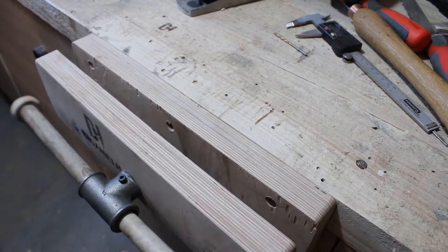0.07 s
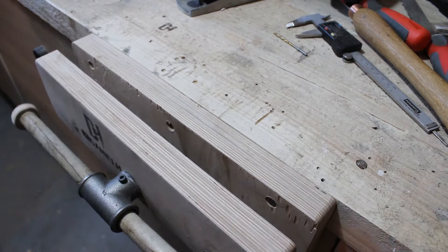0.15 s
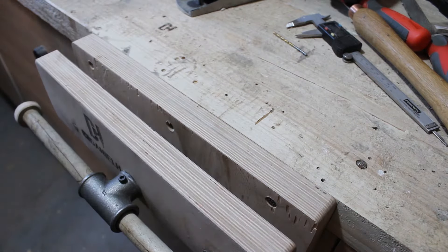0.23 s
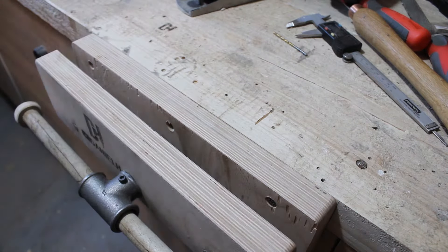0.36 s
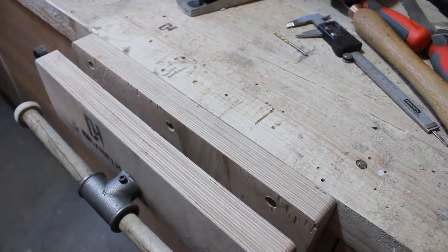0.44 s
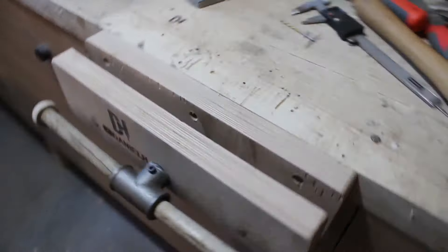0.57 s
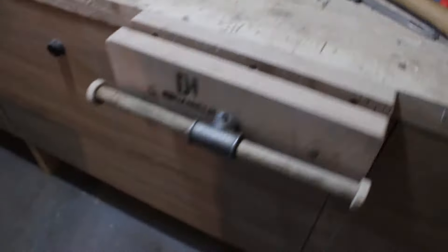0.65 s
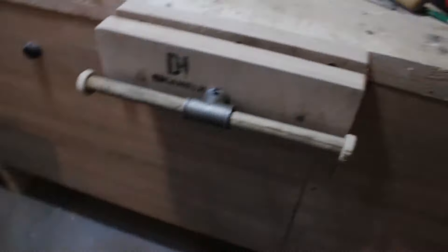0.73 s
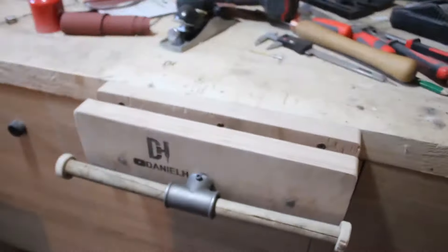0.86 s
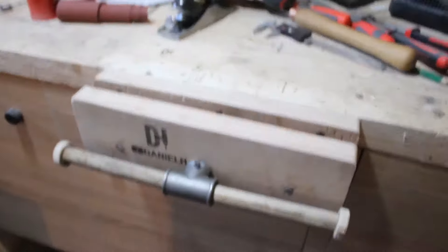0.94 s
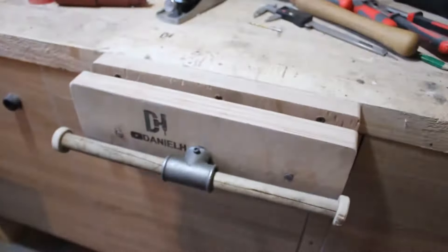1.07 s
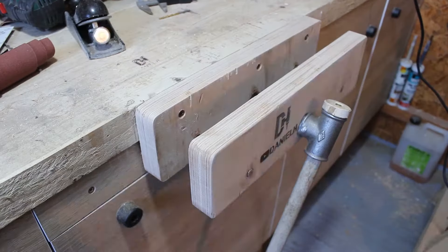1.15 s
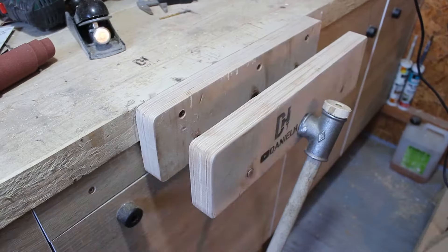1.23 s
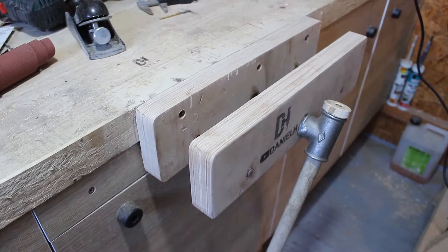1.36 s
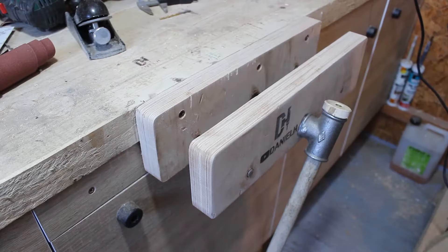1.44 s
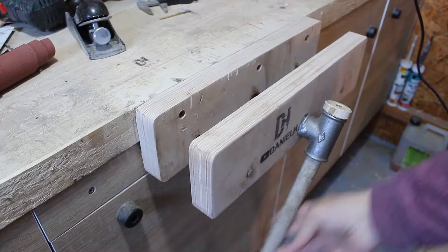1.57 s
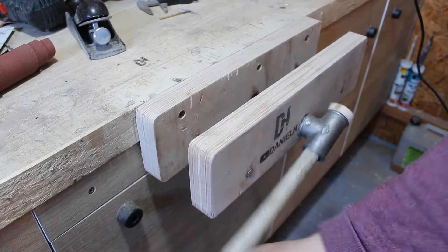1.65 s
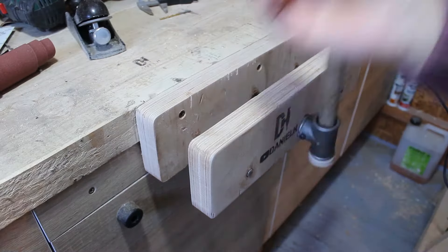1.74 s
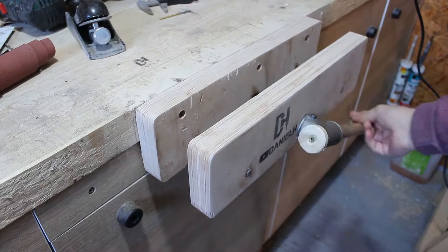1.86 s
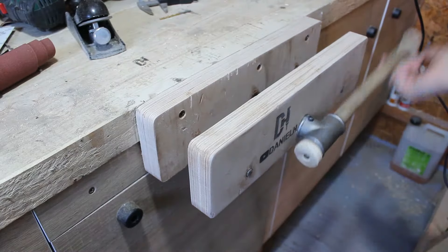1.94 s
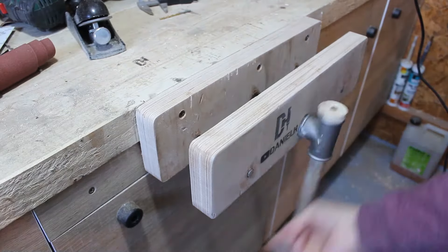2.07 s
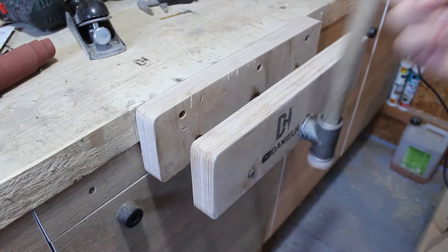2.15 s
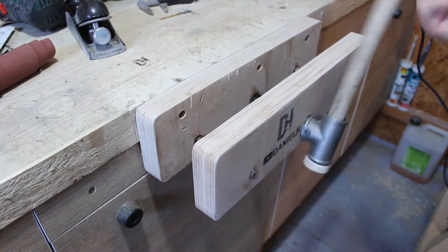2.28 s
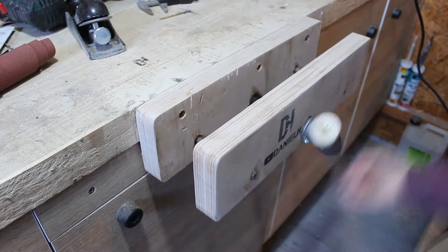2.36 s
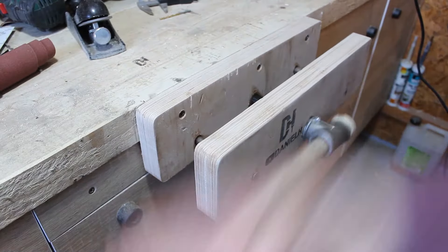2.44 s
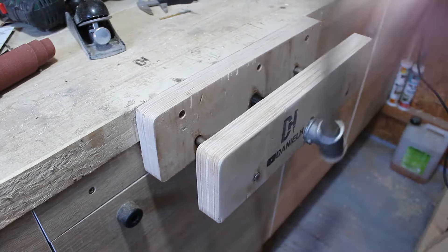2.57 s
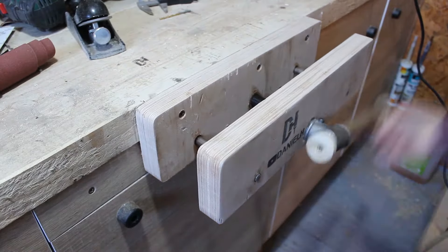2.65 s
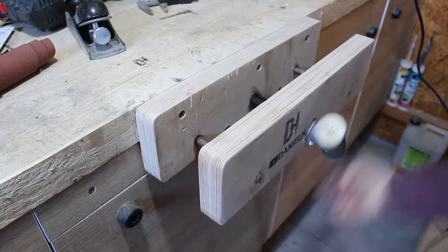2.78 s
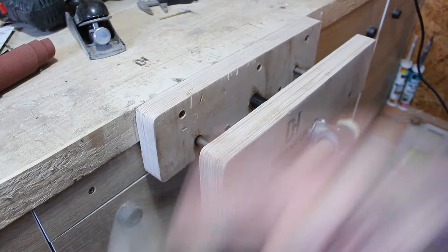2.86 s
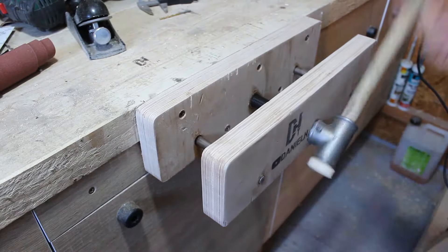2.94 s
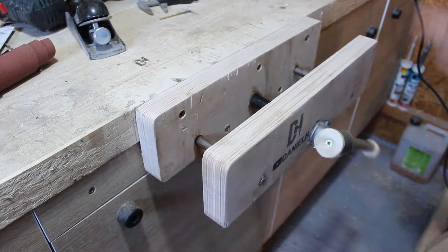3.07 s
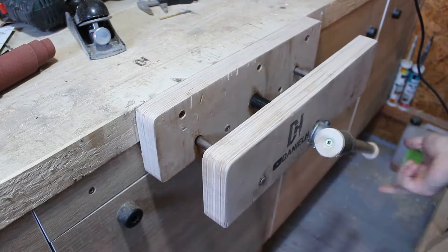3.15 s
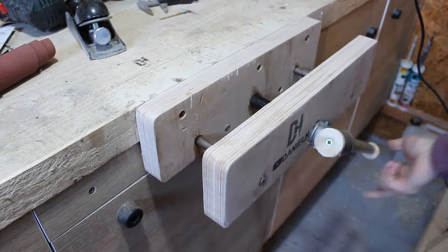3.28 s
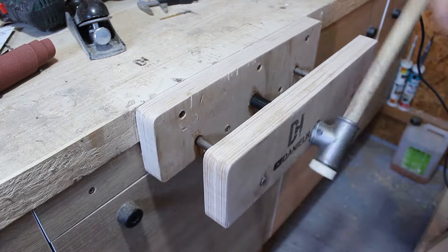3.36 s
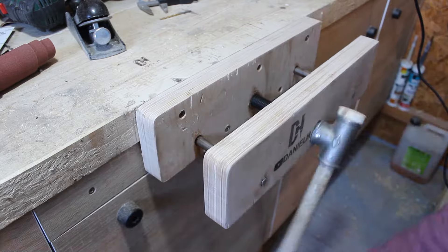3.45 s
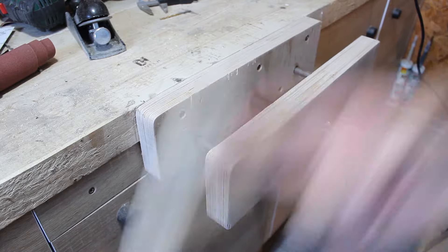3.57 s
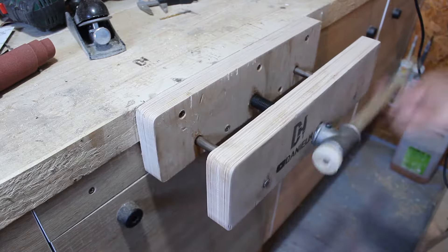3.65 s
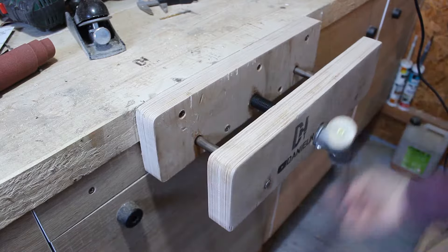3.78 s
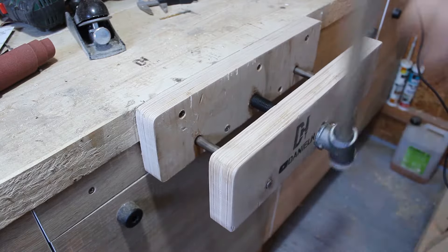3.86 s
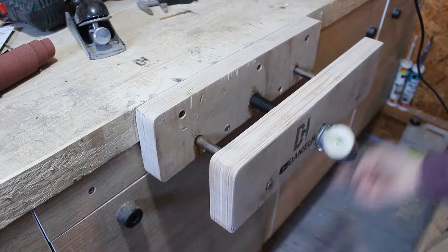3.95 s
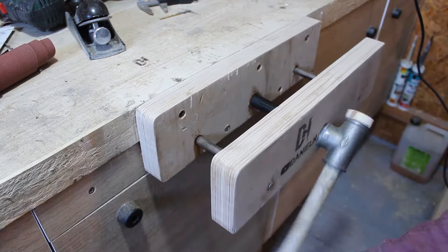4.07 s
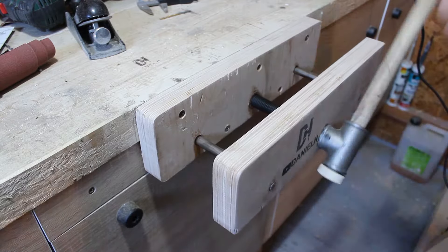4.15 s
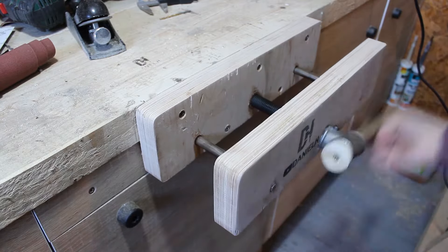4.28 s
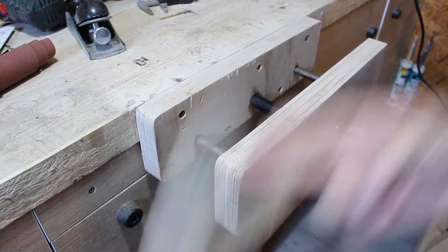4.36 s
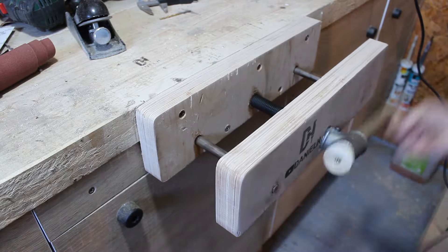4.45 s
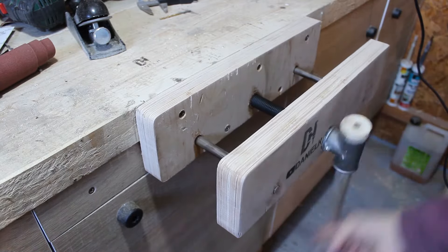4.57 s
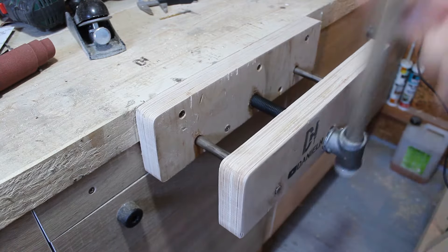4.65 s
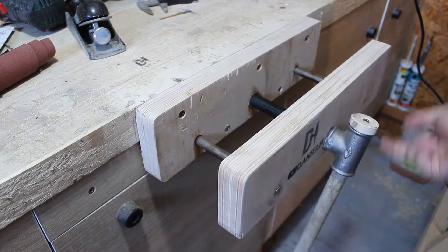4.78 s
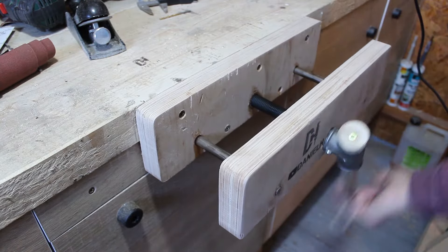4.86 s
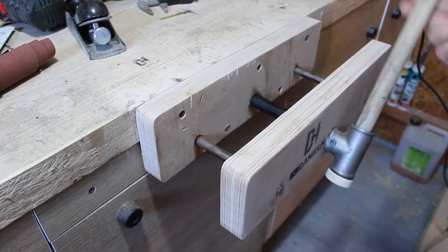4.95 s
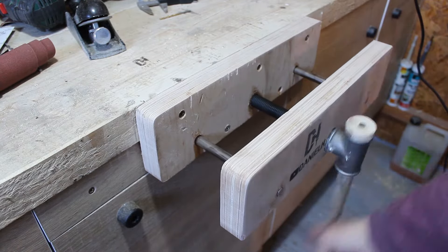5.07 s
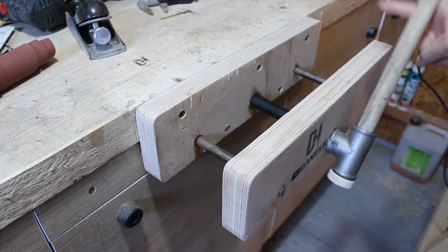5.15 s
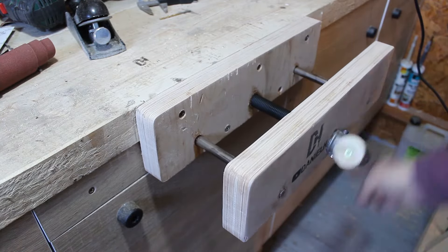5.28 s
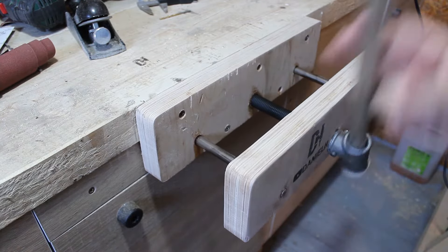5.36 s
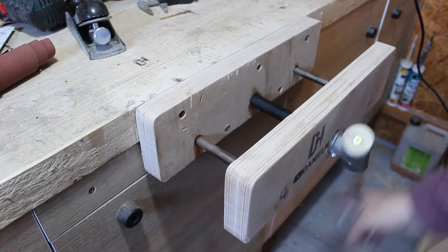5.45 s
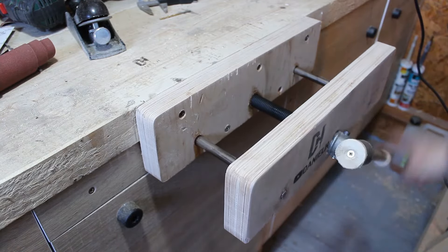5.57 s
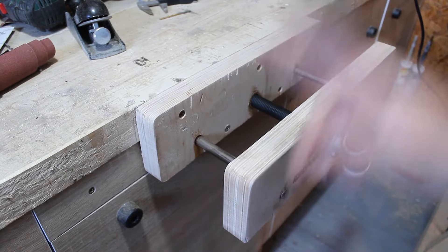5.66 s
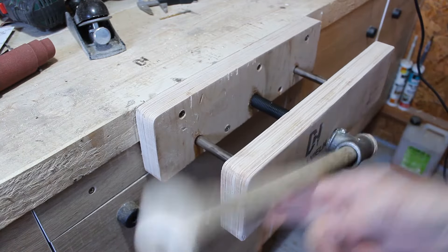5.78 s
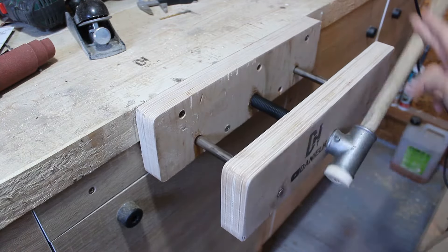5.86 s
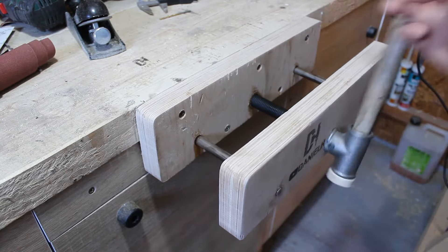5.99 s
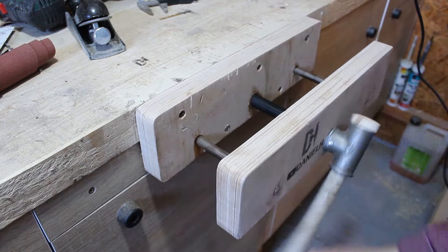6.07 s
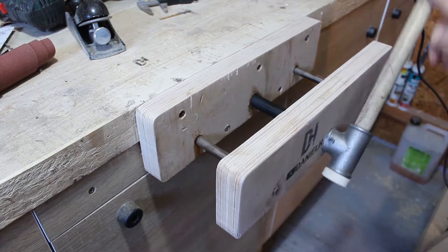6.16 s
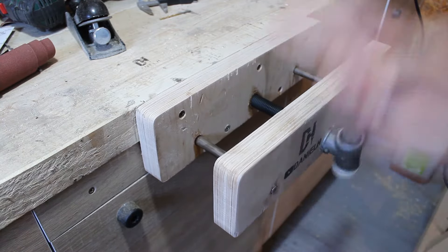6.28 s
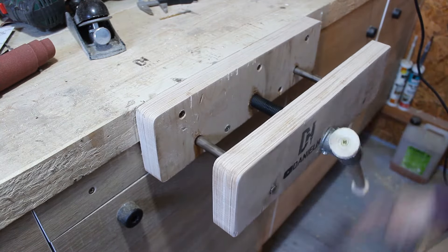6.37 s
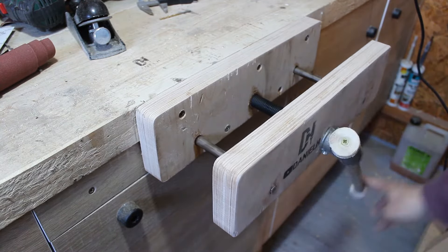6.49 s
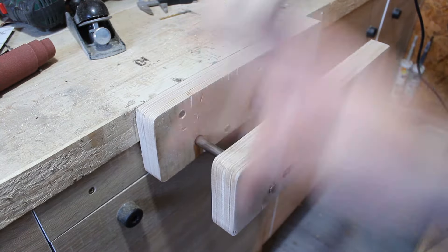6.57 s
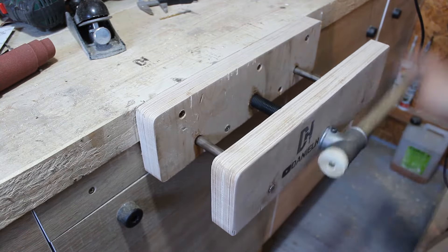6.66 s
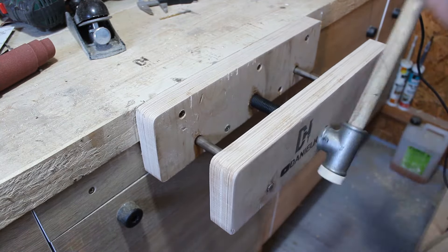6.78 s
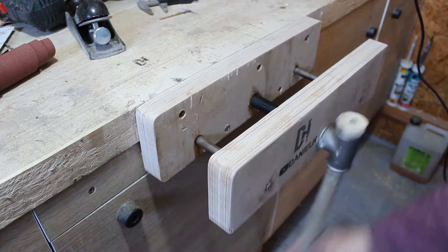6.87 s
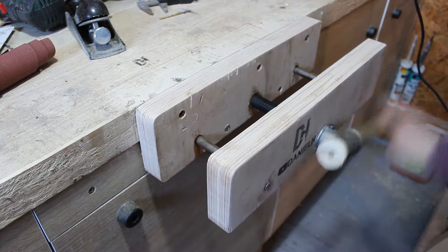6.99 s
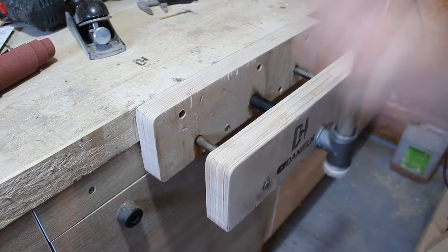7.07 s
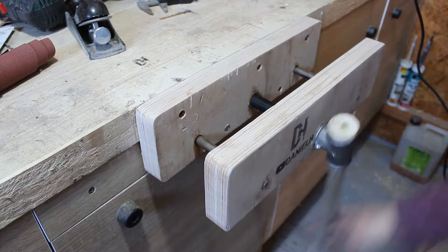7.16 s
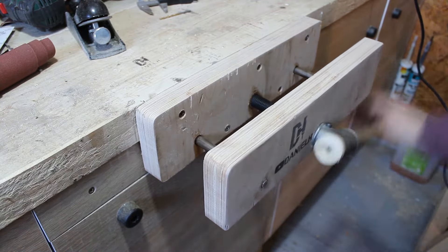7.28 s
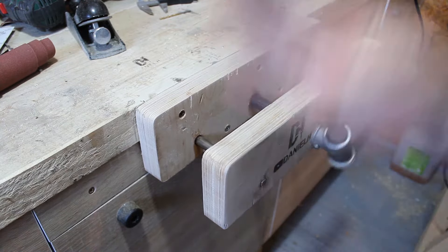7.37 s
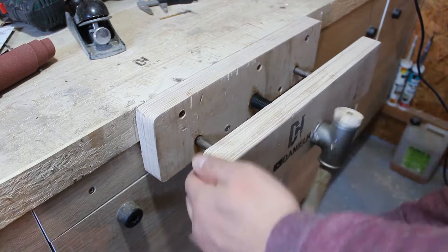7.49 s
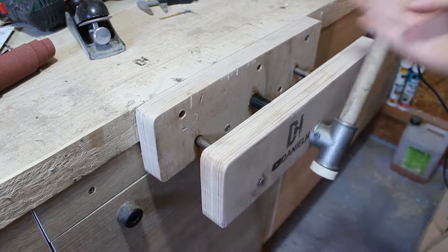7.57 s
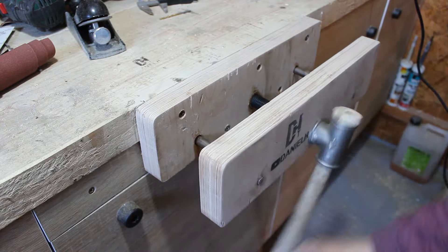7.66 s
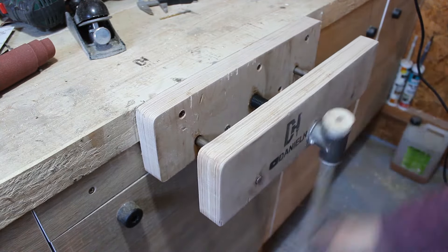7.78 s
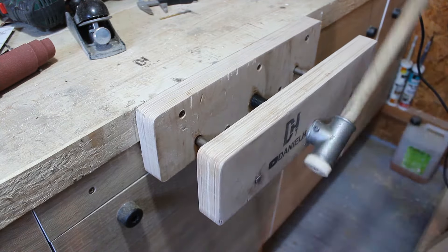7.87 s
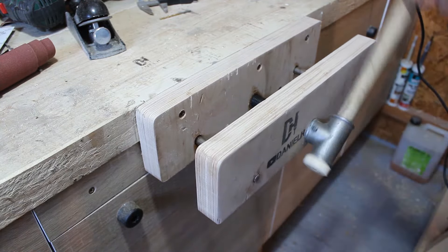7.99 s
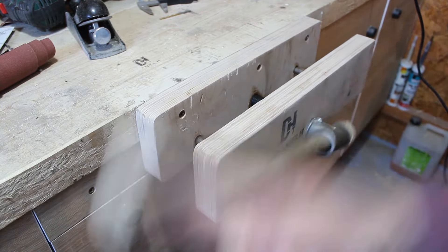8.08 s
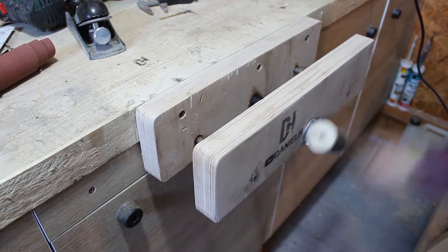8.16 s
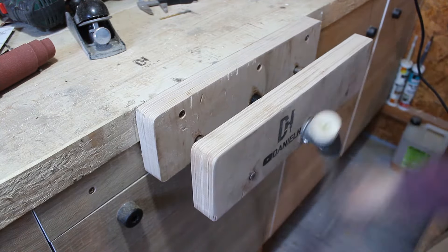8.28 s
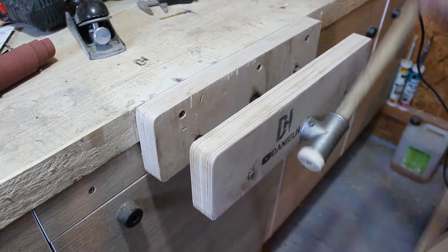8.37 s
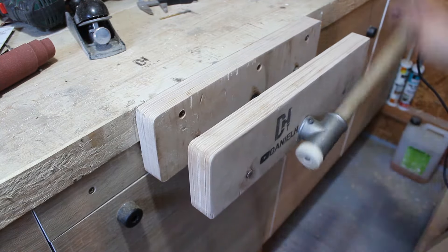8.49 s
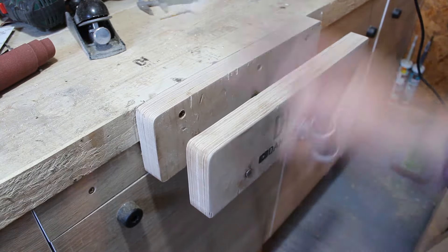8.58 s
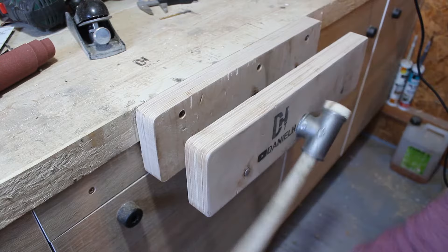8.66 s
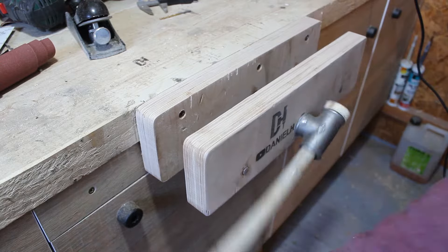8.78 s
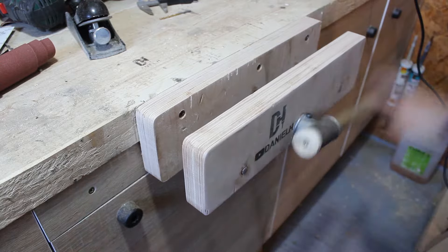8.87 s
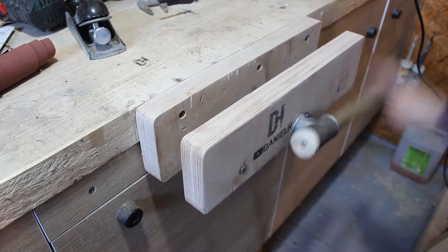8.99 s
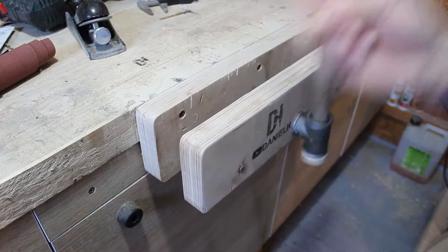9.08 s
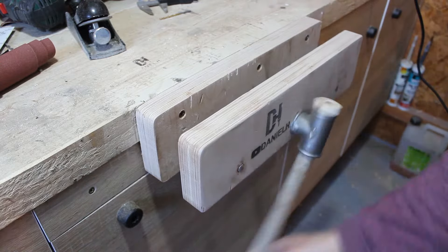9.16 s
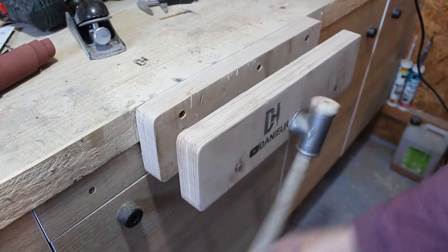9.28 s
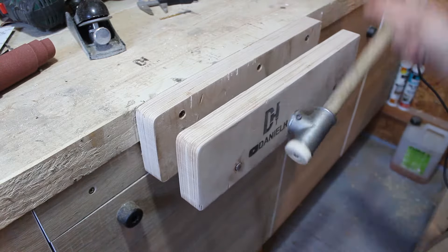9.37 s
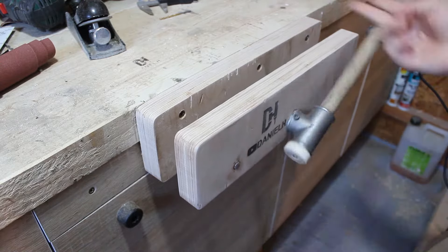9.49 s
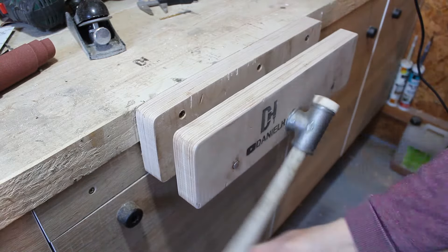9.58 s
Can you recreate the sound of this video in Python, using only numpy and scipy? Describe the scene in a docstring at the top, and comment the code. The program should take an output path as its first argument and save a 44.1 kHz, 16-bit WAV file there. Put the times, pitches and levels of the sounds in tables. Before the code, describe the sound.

A quick wood-on-metal rattle fades into small handling noises on the microphone housing. After a soft start, a dry steel thread grinds in rhythmic rasps as a wooden bench vise is wound out, with short gaps between strokes, hollow knocks from its sliding handle and soft creaks. Winding back, it gives a run of firm clicks, then keeps rasping. Close, dry sound with little room echo over faint still air.

```python
"""The steel screw of a wooden bench vise is wound in strokes: rough friction rubs it in its nut, rings the
plywood jaw and rasps about seven times a second as the screw wobbles. The loose wooden handle slides and
knocks in its pipe tee and the thread clicks: short rough blows that ring resonances, bench and room.
Around them lie jaw bumps, creaks, a squeak, a dowel rattle, a faint ring of the screw, fingers and a
lens whine on a hand-held camera close by, and the still air of a small workshop."""
import sys
import numpy as np
from scipy import signal
from scipy.fft import rfft, irfft, next_fast_len
from scipy.io import wavfile
from scipy.ndimage import uniform_filter1d, map_coordinates

SR = 44100
rng = np.random.default_rng(int(sys.argv[2]) if len(sys.argv) > 2 else 0)


def persist_wave(psi):
    """Save psi, clipped to +-1, as 16-bit WAV."""
    counts = np.round(np.clip(psi, -1, 1) * 32767).astype(np.int16)
    wavfile.write(sys.argv[1], SR, np.atleast_2d(counts).T)


N = 424683
TIME = np.arange(N) / SR
LEAD_S = 0.012  # slide heard ahead of each blow

# resonances of jaw, screw and bench: (frequency [Hz], width [Hz], lift [dB])
VISE_MODES = [(211.4, 24, 18), (280.5, 59, 17.5), (370.5, 8.7, 18.5), (535.5, 39.5, 18.5),
              (586.6, 17.5, 11.5), (655.5, 25.3, 18.5), (854, 17, 6.5), (980, 16, 9), (1304.5, 25.4, 11),
              (1418, 11, 10.5), (1580, 40, 8), (1952, 36, 7), (2145, 51, 11), (2300, 79, 2.5),
              (3157, 85, 6), (3320, 190, 2.5), (3720, 570, 3.5), (4900, 150, 1.5), (5940, 200, 6),
              (6260, 215, 4), (7880, 110, 7)]


def undb(db):
    """Decibels to gain."""
    return 10 ** (np.asarray(db) / 20)


def unit(x):
    """Scale to rms 1."""
    return x / np.sqrt(np.mean(x ** 2))


def curve(rows, axis=1):
    """One column of a table, joined by straight lines in time."""
    rows = np.array(rows)
    return np.interp(TIME, rows[:, 0], rows[:, axis])


def walk(rate_hz):
    """Smooth random wandering with spread 1."""
    steps = max(int(SR / rate_hz), 1)
    held = np.repeat(rng.standard_normal(N // steps + 1), steps)[:N]
    return unit(uniform_filter1d(held, steps))


def add(track, start_s, sound):
    """Mix a sound into the track."""
    i = max(int(start_s * SR), 0)
    track[i:i + len(sound)] += sound[:N - i]


def band(x, lo_hz, hi_hz, order=4):
    """Causal band-pass."""
    edges_hz = [lo_hz, min(hi_hz, SR / 2 - 1)]
    return signal.sosfilt(signal.butter(order, edges_hz, "band", fs=SR, output="sos"), x)


def through(x, impulse):
    """Pass a sound through an impulse response."""
    return signal.fftconvolve(x, impulse)[:len(x)]


def causal(log_gain, order):
    """Frequency response of a causal filter with this log gain, its cepstrum cut at `order` samples."""
    cepstrum = irfft(log_gain)
    cepstrum[1:order] *= 2
    cepstrum[order:] = 0
    return np.exp(rfft(cepstrum))


def response(colour, modes=(), size=8192):
    """Impulse response of a body: a smooth causal colour, lifted at each resonance."""
    f = np.maximum(np.arange(size // 2 + 1) * SR / size, 1)
    hz, db = np.transpose(colour)
    colour_db = np.interp(np.log(f), np.log(hz), db)
    gain = causal(np.log(undb(colour_db)), order=size // 2)
    for centre, width, lift in modes:
        resonance = 1 / (1 + 1j * (f ** 2 - centre ** 2) / (f * width))
        gain = gain * (1 + (undb(lift) - 1) * resonance)
    return irfft(gain)


def echoes(t60_s, level_db, size=16384):
    """Dense reflections that build up in a few milliseconds and die away."""
    t = np.arange(size) / SR
    decay = np.exp(-np.log(1000) * t / t60_s)
    tail = rng.standard_normal(size) * decay * (1 - np.exp(-t / 0.0046))
    return undb(level_db) * tail / np.linalg.norm(tail)


def grit(size, spread_db):
    """Contact force of a rough surface: countless tiny slips of unequal strength."""
    return unit(rng.standard_normal(size) * undb(spread_db * rng.standard_normal(size)))


def even(force, order=260):
    """Soften chance peaks and holes in the spectrum of a force, so that mainly the body colours it."""
    even_share = 0.55  # share of the unevenness in log gain that is undone
    spectrum = rfft(force)
    return irfft(spectrum * causal(-even_share * np.log(np.abs(spectrum) + 1e-9), order))


def registers(level_db, pitch_hz, fall_db):
    """Level of each register of a blow: loudest at its pitch, weaker with every octave away from it."""
    # centres of the five registers: (frequency [Hz])
    centres_hz = np.array((220, 600, 1200, 2850, 8600))
    octaves = np.log2(centres_hz / min(pitch_hz, centres_hz[-1]))
    return level_db - fall_db * np.abs(octaves)


def spot(pitch_hz, lift_db):
    """The broad resonance of the place where a blow lands, its width a share of its pitch."""
    return [(pitch_hz, 0.42 * pitch_hz, lift_db)]


def struck(modes):
    """The loose dowel is held a little differently at every blow, so its resonances shift."""
    # spread from blow to blow: (shift as a share of the pitch, change of lift [dB])
    spread = (0.0087, 1.7)
    chance = rng.standard_normal((len(modes), 2)) * spread
    return [(hz * (1 + shift), width, max(lift + db, 0))
            for (hz, width, lift), (shift, db) in zip(modes, chance)]


def blow(body, contact_s, bands_db, spread_db, slide_db, bench_s, bench_db, room_s, room_db, size=12000):
    """A slide ends in a short rough contact that rings body, bench and room, set by five registers."""
    # borders of the five registers: (frequency [Hz])
    edges_hz = (50, 450, 800, 1800, 4500, 16500)
    t = np.arange(size) / SR - LEAD_S
    age = np.maximum(t, 0) / max(contact_s / 2, 1 / SR)  # the push peaks at half the contact time
    slide = (t < 0) * undb(slide_db) * np.exp(-np.abs(t) / 0.0024)
    push = age * np.exp(1 - age) + slide
    force = even(grit(size, spread_db) * push, order=80)
    reflections = echoes(bench_s, bench_db) + echoes(room_s, room_db)
    sound = through(even(force + through(force, reflections)), body)
    attack = int(0.03 * SR)  # each register is levelled over the first 30 ms of the blow
    parts = [band(sound, lo, hi) for lo, hi in zip(edges_hz, edges_hz[1:])]
    return sum(undb(db) * part / np.std(part[t >= 0][:attack]) for part, db in zip(parts, bands_db))


def air():
    """Quiet room tone: coloured noise whose level drifts slowly."""
    # still air of the workshop: (frequency [Hz], level [dB])
    air_colour = [(25, -7), (80, -1), (150, 4.5), (280, 6.5), (500, 2), (1500, 3), (3000, 0.5),
                  (7000, -3.5), (15500, -5)]
    tone = unit(through(rng.standard_normal(N), response(air_colour)))
    return undb(-54.5 + 0.86 * walk(0.57)) * tone


def camera():
    """Fingers tick, thump and brush on the housing while a faint whine sounds, as of the lens focusing."""
    # finger taps: (time [s], contact [s], level [dB], pitch [Hz], fall-off [dB per octave])
    taps = [(.376, 0.0022, -52.5, 10000, 15), (0.469, 0.0037, -52.5, 2400, 11),
            (.533, 0.0066, -47, 14000, 4), (0.592, 0.00087, -43.5, 13500, 2.5),
            (0.595, 0.0019, -30.5, 14200, 11), (0.732, 0.0027, -47.5, 222, 5), (0.754, 0.0055, -51, 220, 3),
            (0.811, 0.0027, -42.5, 900, 0.5), (0.8768, 0.0011, -41.5, 1150, 4), (0.882, .001, -50, 1130, 1),
            (0.898, 0.0089, -46.5, 600, 0.5), (0.913, 0.011, -48, 600, 4), (.993, 0.0022, -51, 8600, 8),
            (1.017, 0.0088, -44, 8600, 7), (1.048, .0007, -55, 7000, 3), (1.063, 0.004, -49.5, 8800, 6),
            (1.179, 0.0014, -39.5, 12500, 17), (1.446, .0048, -49.5, 2600, 14),
            (1.519, 0.0021, -52, 8660, 12), (1.597, 0.0064, -43, 8830, 4.5)]
    # force spectrum of a finger: (frequency [Hz], level [dB])
    tap_colour = [(40, -11), (110, 11), (300, 8), (850, 0.5), (2500, -11.5), (6500, -8), (10000, -5),
                  (13500, -7.5), (16000, -15)]
    # resonances of the housing: (frequency [Hz], width [Hz], lift [dB])
    housing = [(4320, 110, 6), (6400, 400, 13.5), (8100, 180, 6), (13500, 830, 9), (15100, 500, 10)]
    # fingers brush the housing: (time [s], level [dB])
    brush_levels = [(.52, -76), (.57, -48.5), (.66, -51), (.73, -69), (.84, -40), (1.08, -64), (1.2, -94)]
    # swells of the whine: (time [s], level [dB])
    lens_levels = [(.95, -90), (.98, -46), (1.09, -67), (1.125, -48), (1.18, -43), (1.195, -90)]
    # resonances of the whine: (frequency [Hz], width [Hz], lift [dB])
    lens_modes = [(3980, 27, 32), (4830, 90, 22), (5830, 32, 32), (6600, 250, 5), (7900, 180, 6),
                  (9600, 50, 19)]
    out = np.zeros(N)
    for s, contact_s, level_db, pitch_hz, fall_db in taps:
        tapped = response(tap_colour, housing + spot(pitch_hz, lift_db=12.0))
        bands_db = registers(level_db, pitch_hz, fall_db)
        add(out, s - LEAD_S, blow(tapped, contact_s, bands_db, spread_db=8.0, slide_db=-19,
                                  bench_s=0.022, bench_db=-4.0, room_s=0.8, room_db=-28))
    lens = response([(500, -18.5), (3000, -7), (15000, 8)], lens_modes)
    whine = unit(through(grit(N, spread_db=10.5), lens))
    skin = grit(N, spread_db=7.5)
    brush = unit(band(through(skin, response(tap_colour, housing)), 780, 17400))
    return out + whine * undb(curve(lens_levels)) + brush * undb(curve(brush_levels))


def rattle():
    """The level dowel is jogged and bounces from side to side in its tee, each blow at its own pitch."""
    # blows, before the layer gain: (time [s], contact [s], level [dB], pitch [Hz], fall-off [dB per octave])
    # a glancing blow falls off steeply either side of its pitch, a square one hardly at all
    bounces = [(0.042, 0.0036, -23, 1260, 14.5), (0.063, 0.0059, -52.5, 1500, -3.5),
               (.11, 0.0041, -34.5, 800, 1), (0.1176, 0.0016, -25, 910, 3), (0.155, 0.0021, -28, 3200, 3),
               (0.181, 0.0014, -32.5, 930, 5), (0.201, 0.0025, -36, 2730, 1),
               (0.239, 0.0046, -42.5, 3180, 0), (0.262, 0.004, -39.5, 3150, 1.5),
               (.304, 0.0072, -46.5, 2400, 4.5)]
    # force spectrum of a bounce: (frequency [Hz], level [dB])
    rattle_colour = [(130, -35), (210, 3), (1100, 12), (2200, -3), (4200, -7), (10000, -23)]
    # resonances of the dowel lying level: (frequency [Hz], width [Hz], lift [dB])
    dowel = [(426, 32, 4), (630, 27, 11), (871, 25, 11.5), (1462, 62, 13), (1723, 50, 6), (2800, 86, 7),
             (3250, 200, 13), (4100, 280, 5.5), (6000, 170, 6.5)]
    out = np.zeros(N)
    for s, contact_s, level_db, pitch_hz, fall_db in bounces:
        body = response(rattle_colour, struck(dowel) + spot(pitch_hz, lift_db=3.5))
        bands_db = registers(level_db, pitch_hz, fall_db)
        bands_db[0] += -2.5  # the light dowel barely shakes the bench
        add(out, s - LEAD_S, blow(body, contact_s, bands_db, spread_db=4, slide_db=-6.5,
                                  bench_s=0.049, bench_db=-4.5, room_s=0.28, room_db=-13.5))
    return undb(-1.1) * out


def creak():
    """Dry spots sing and groan softly as they start to slip: wavering stick-slip tones."""
    # one curve for each creak: (time [s], pitch [Hz], level [dB])
    creaks = [
        [(.55, 259, -58), (.61, 292, -52), (.67, 326, -59), (.70, 320, -72)],
        [(1.21, 582, -75), (1.24, 576, -54.5), (1.6, 580, -63), (1.95, 580, -62), (2.0, 580, -69)],
        [(1.22, 250, -79), (1.28, 255, -56), (1.37, 243, -54), (1.42, 240, -78)],
        [(1.23, 850, -90), (1.26, 917, -58), (1.30, 1154, -55), (1.34, 1280, -56), (1.42, 1272, -62),
         (1.62, 1366, -56), (1.65, 1420, -110)],
        [(2.0, 374, -64), (2.2, 367.7, -49.5), (2.7, 368, -52), (3.1, 368, -55)],
        [(5.42, 232, -58), (5.46, 272, -48), (5.52, 337, -41), (5.56, 372, -46), (5.60, 420, -62)],
    ]
    out = np.zeros(N)
    waver = 1 + 0.0168 * walk(250)  # unsteadiness as a share of the pitch
    for rows in creaks:
        sounding = (TIME > rows[0][0]) & (TIME < rows[-1][0])
        phase = 2 * np.pi * np.cumsum(curve(rows) * waver) / SR
        out += sounding * undb(curve(rows, axis=2)) * np.sin(phase)
    return out


def steel_ring(drive, ring_db=-27, t60_s=0.98):
    """The long screw keeps singing faintly after it is shaken: decaying sines driven by the vise sound."""
    t = np.arange(SR) / SR
    modes = [(577, 15), (1290, -20), (2980, -11)]  # (frequency [Hz], level before scaling [dB])
    tones = sum(undb(db) * np.sin(2 * np.pi * hz * t) for hz, db in modes)
    ring = tones * np.exp(-np.log(1000) * t / t60_s)
    return unit(through(drive, ring)) * np.std(drive) * undb(ring_db)


def squeak():
    """Dry steel slips for an instant as the screw stops and rings high: a decaying burst of noise."""
    # the one squeak: (time [s], level [dB], decay [s])
    s, db, decay_s = (6.410, -22.5, 0.013)
    # its resonances: (frequency [Hz], width [Hz], lift [dB])
    squeak_modes = [(2940, 220, 26), (5770, 180, 11), (7640, 180, 21), (14000, 770, 25)]
    body = response([(500, -2), (3000, -0.5), (15000, -10)], squeak_modes)
    tone = unit(through(rng.standard_normal(N), body))
    return undb(db) * tone * (TIME > s) * np.exp(-np.abs(TIME - s) / decay_s)


def jaw(swell_s=0.016):
    """The jaw presses on its guide rods for a moment at each bump and makes the boards drone."""
    # soft bumps, before the layer gain: (time [s], level [dB])
    bumps = [(1.95, -48), (2.978, -40), (3.539, -47), (3.693, -45), (3.841, -45.5), (4.004, -38.5),
             (4.162, -40), (4.32, -45.5), (4.468, -40), (5.075, -45), (5.345, -45), (6.026, -39),
             (6.089, -41.5), (6.398, -34), (6.681, -43), (6.836, -40), (6.971, -47), (7.293, -48),
             (7.449, -43), (7.527, -42.5), (7.715, -44), (8.712, -47), (9.358, -45)]
    # force spectrum of a bump: (frequency [Hz], level [dB])
    bump_colour = [(60, -20), (130, -39), (200, 3), (330, -5.5), (500, -43), (1000, -5), (3000, -31)]
    drone = through(rng.standard_normal(N), response(bump_colour, VISE_MODES))
    # every bump carries its own weight, however the grain falls
    drone = drone / np.sqrt(uniform_filter1d(drone ** 2, size=1500))
    pressure = sum(undb(db) * np.exp(-0.5 * ((TIME - s) / swell_s) ** 2) for s, db in bumps)
    return undb(1.0) * pressure * drone


def thread():
    """The screw takes up its slack with a hard steel click that rings nut and jaw."""
    # clicks, before the layer gain: (time [s], level [dB], and relative to it
    # hum of the nut [dB], knock of the jaw [dB], snap of the steel [dB])
    clicks = [(2.271, -41.5, -19, -14, -12), (2.398, -38.5, -13, -5, -5), (2.546, -39.5, -14, -13, -16),
              (2.688, -43, -14, -18, -18), (4.531, -42, -15, -15, -20), (5.8414, -17.5, -10.5, -9.5, -7.5),
              (7.8125, -20, -3, -12.5, -12), (7.952, -28.5, -8, 3, -12), (8.084, -26.5, -4.5, 0.5, -6),
              (8.2091, -22, -1, -9, -13.5), (8.327, -34.5, 6.5, 4, -9), (8.45, -26.5, -0.5, -3, -11),
              (8.563, -38.5, 11.5, 5.5, 0), (8.8, -42, -16, 0, -10)]
    # force spectrum of a click: (frequency [Hz], level [dB])
    click_colour = [(140, -13), (220, 8.5), (450, -8), (900, -4), (2200, -6), (3200, -3.5), (4600, 1),
                    (7000, 1), (10500, -9.5), (15500, -24)]
    # resonances of nut and jaw as the thread snaps into place: (frequency [Hz], width [Hz], lift [dB])
    nut = [(235.9, 110, 18), (355, 14, 19.5), (592, 26, 22), (660, 18, 10.5), (1428, 35, 16),
           (1614, 31, 9.5), (1760, 31, -6), (2122, 49, 13.5), (3100, 200, 26), (3430, 48, 7), (3790, 90, 7),
           (6200, 220, 9.5), (7260, 200, 8), (7850, 170, 7)]
    thud_db = -11.5  # lowest register, relative to the level of the click
    out, body = np.zeros(N), response(click_colour, nut)
    for s, level_db, hum_db, knock_db, snap_db in clicks:
        bands_db = level_db + np.array([thud_db, hum_db, knock_db, 0, snap_db])
        add(out, s - LEAD_S, blow(body, 0.0026, bands_db, spread_db=2.0, slide_db=-41,
                                  bench_s=0.03, bench_db=-6.5, room_s=0.22, room_db=-49))
    return undb(-2.6) * out


def handle():
    """The dowel slides through the tee and its end caps strike the steel, each blow with its own note."""
    # knocks, before the layer gain: (time [s], contact [s], level [dB], pitch [Hz],
    # fall-off [dB per octave], thud of the bench [dB], ringing note [Hz])
    knocks = [(1.651, 0.0039, -21.5, 590, 2, -37, 632), (1.707, .0031, -21.5, 1080, 11.5, -44, 1320),
              (1.987, 0.0042, -20, 610, 2, -41, 354), (2.005, 0.0033, -30, 600, 8, -57, 698),
              (2.115, 0.003, -30, 2380, 15, -49, 3100), (2.17, 0.0036, -34.5, 600, 10, -39, 655),
              (2.185, 0.0014, -30.5, 980, 15, -40, 945), (2.598, 0.011, -32, 920, 4.5, -58, 970),
              (2.827, 0.0034, -34.5, 1190, 6, -37, 1270), (3.131, 0.0075, -25, 7100, 1, -51, 3400),
              (3.144, .004, -29, 607, 1, -32.5, 930), (3.252, 0.006, -34, 900, 1, -33, 875),
              (3.257, 0.0033, -25.5, 900, 2, -36, 870), (3.27, 0.0077, -28, 1130, 1, -34, 980),
              (3.386, 0.003, -18.5, 2330, 4.5, -38, 1310), (4.629, .007, -33.5, 1020, 5, -35, 1270),
              (4.714, .004, -36.5, 810, 7, -48, 970), (4.76, 0.005, -30.5, 614, 3.5, -27.5, 570),
              (4.797, 0.0024, -32.5, 597, 3, -36, 575), (4.915, 0.0018, -23, 920, 9, -39, 1290),
              (4.936, 0.0027, -33.5, 600, 6, -37.5, 640), (5.222, 0.0016, -36.5, 900, 10, -44, 980),
              (5.342, 0.0045, -43, 800, 2, -42, 655), (5.546, .0053, -31, 7000, 0.5, -43, 2110),
              (5.555, 0.0046, -31.5, 600, 0, -31, 655), (5.651, .0026, -33, 990, 5.5, -36.5, 1300),
              (5.822, 0.011, -29.5, 1200, 4.5, -29, 1440), (5.851, 0.0053, -27, 780, 5, -23.5, 520),
              (6.15, 0.003, -37, 1500, 6, -34, 1400), (6.312, 0.0052, -32, 600, 10, -38, 655),
              (6.441, .002, -27, 580, 5.5, -31.5, 610), (6.467, 0.0028, -36, 900, 6, -34.5, 970),
              (6.484, 0.0026, -35, 1000, 16, -44, 970), (6.567, 0.003, -24.5, 1060, 7, -38, 1287),
              (7.045, 0.0032, -29.5, 1690, 5, -45, 1990), (7.134, 0.0033, -24.5, 550, 13, -39, 590),
              (7.196, 0.0088, -31.5, 1780, 4.5, -41, 1420), (7.641, 0.0043, -35, 1180, 6.5, -56, 1300),
              (9.279, .005, -35.5, 1400, 7, -56, 1290)]
    # force spectrum of a knock: (frequency [Hz], level [dB])
    knock_colour = [(60, -43), (140, -11.5), (220, 19.5), (450, -15), (800, -10), (2500, -2.5), (4200, -1),
                    (7500, 3), (10500, 0), (15500, -7)]
    # resonances of handle and tee, damped by the hand: (frequency [Hz], width [Hz], lift [dB])
    handle_modes = [(249, 155, 17.5), (357.6, 15, 12.5), (580, 43, 17), (668, 37, 13.5), (943, 84, 7),
                    (1307, 52, 7.5), (1416, 23, 11.5), (2140, 66, 10.5), (2610, 88, 7), (2890, 70, 5),
                    (3380, 90, 4), (4150, 91, -6), (6250, 750, 5), (7380, 190, 1)]
    note_width_hz, note_lift_db = 39, 9
    out = np.zeros(N)
    for s, contact_s, level_db, pitch_hz, fall_db, thud_db, note_hz in knocks:
        note = [(note_hz, note_width_hz, note_lift_db)]
        body = response(knock_colour, struck(handle_modes) + spot(pitch_hz, lift_db=6) + note)
        bands_db = [thud_db, *registers(level_db, pitch_hz, fall_db)[1:]]
        add(out, s - LEAD_S, blow(body, contact_s, bands_db, spread_db=0.5, slide_db=-10.5,
                                  bench_s=0.058, bench_db=-8.0, room_s=0.4, room_db=-23.5))
    return undb(-2.36) * out


def scuffs(rate_hz=60, spread_db=0.8, size=400):
    """Burrs on the thread catch for a few milliseconds, dozens of times a second."""
    force = np.zeros(N)
    fade = np.exp(-np.arange(size) / (0.0064 * SR))
    for when, strength in rng.random((int(rate_hz * N / SR), 2)):
        add(force, when * N / SR, undb(-spread_db * np.log(max(strength, 0.03))) * fade)
    return unit(force * rng.standard_normal(N))


def chirps(rate_hz=110, lo_hz=750, hi_hz=3700, glide=-0.17, size=380):
    """Dry spots stick and slip for a dozen cycles or so: tiny squeaks that sag in pitch."""
    out, age = np.zeros(N), np.arange(size) / size
    swell = np.sin(np.pi * np.sqrt(age)) ** 2
    for when, pitch, strength in rng.random((int(rate_hz * N / SR), 3)):
        hz = lo_hz * (hi_hz / lo_hz) ** pitch * (1 + glide * age)
        add(out, when * N / SR, strength * swell * np.sin(2 * np.pi * np.cumsum(hz) / SR))
    return unit(out)


def chatter(rate_hz=34, lo_hz=560, hi_hz=2300, decay_s=0.0036, spread_db=4.5, size=900):
    """The loose dowel and rods tap in their holes: small knocks, each at its own pitch."""
    out, t = np.zeros(N), np.arange(size) / SR
    for when, pitch, strength in rng.random((int(rate_hz * N / SR), 3)):
        hz = lo_hz * (hi_hz / lo_hz) ** pitch
        ring = np.sin(2 * np.pi * hz * t) * np.exp(-t / decay_s)
        add(out, when * N / SR, undb(-spread_db * np.log(max(strength, 0.08))) * ring)
    return unit(band(out + through(out, echoes(0.085, -0.86)), 430, 5800))


def gap(sound):
    """Treble bounces between the jaws; its reflections change slowly as the opening widens and narrows."""
    # how far the jaw stands open: (time [s], share [0-1])
    opening = [(1.7, 0.26), (6.0, 1), (9.6, 0.56)]
    treble = band(sound, 2500, 22500)
    angle = np.pi / 2 * curve(opening)
    shut, wide = (through(treble, echoes(t60_s=0.025, level_db=-8)) for _ in range(2))
    return sound + np.cos(angle) * shut + np.sin(angle) * wide


def shifting(sound):
    """The load wanders over the thread: resonances shift a little and each register flares on its own."""
    # borders of the flaring registers: (frequency [Hz])
    grain_edges_hz = (450, 800, 1200, 1800, 2700, 4000, 6500, 10000, 17000)
    grain_db, grain_rate_hz = 2, 70
    load_shift = 0.007  # spread of the playing speed
    bent = map_coordinates(sound, [np.cumsum(1 + load_shift * walk(grain_rate_hz / 2))], mode="mirror")
    size = next_fast_len(N)
    spectrum, hz = rfft(bent, size), np.linspace(0, SR / 2, size // 2 + 1)
    for lo, hi in zip(grain_edges_hz, grain_edges_hz[1:]):
        part = irfft(spectrum * (hz >= lo) * (hz < hi), size)[:N]
        bent = bent + part * (unit(undb(grain_db * walk(grain_rate_hz))) - 1)
    return bent


def friction():
    """Gains of grind and hiss: each stroke starts, holds and dies away, and every wobble swells it."""
    # strokes of the hand: (start [s], end [s], friction at start [dB], friction at end [dB],
    # hiss relative to it [dB])
    strokes = [(1.28, 1.646, -59.5, -55, -3), (1.668, 1.932, -39.5, -47, -4),
               (2.003, 3.127, -40.5, -38, -4), (3.41, 4.829, -43.5, -42, -2.5),
               (4.9, 5.543, -42.5, -40, -4.5), (5.637, 5.841, -39, -33, -8), (5.902, 6.425, -41.5, -40, -4),
               (6.56, 7.722, -41.5, -42.5, -2), (7.729, 9.557, -38, -38.5, -3), (9.594, 9.64, -45, -35, -1)]
    # runs of rasps, one a wobble: (first [s], until [s], period [s], first swell [dB], last swell [dB],
    # Gaussian spread [s])
    wobbles = [(2.11, 3.05, 0.15, 3, 0.5, 0.025), (3.53, 4.55, .157, 4, 5, .026),
               (5.073, 5.87, .14, 0, 0.5, 0.027), (6.003, 6.40, .16, 13, 12.5, .026),
               (6.603, 6.7, .16, 11, 11, .018), (6.792, 7.80, .159, 12.5, 7.5, .026),
               (7.89, 8.60, 0.127, 3, 4.5, 0.027), (8.749, 9.60, 0.128, 1, 3.5, .02)]
    attack_s, release_s = 0.02, 0.044
    hiss_share = 0.54  # share of a rasp's swell in dB that the hiss follows
    grind, hiss, swell = np.zeros((3, N))
    for start, end, first_db, last_db, hiss_db in strokes:
        onset = 1 - np.exp(-np.maximum(TIME - start, 0) / attack_s)
        release = np.exp(-np.maximum(TIME - end, 0) / release_s)
        stroke = onset * release * undb(np.interp(TIME, [start, end], [first_db, last_db]))
        grind, hiss = grind + stroke, hiss + undb(hiss_db) * stroke
    for first, until, period, first_db, last_db, width_s in wobbles:
        times = np.arange(first, until, period)
        rasp = signal.windows.gaussian(int(8 * width_s * SR), width_s * SR)
        for s, db in zip(times, np.linspace(first_db, last_db, len(times))):
            add(swell, s - len(rasp) / SR / 2, db * rasp)
    waver = 0.92 * walk(12)  # dB; the hand never pushes quite evenly
    return grind * undb(swell + waver), hiss * undb(hiss_share * swell + waver)


def screw(flutter_db=0.83, scuff_db=-5, split_hz=4500):
    """The thread grinds and catches in the nut: rough force through the vise, shaped by the strokes."""
    # force spectrum of the friction: (frequency [Hz], level [dB])
    rub_colour = [(70, -24), (130, -20), (200, -12.5), (450, -18), (1000, 5), (2500, 1.5), (4500, -8),
                  (7000, -8.5), (10500, -11.5), (15500, -12)]
    force = grit(N, spread_db=2) * undb(flutter_db * walk(130) + 0.24 * walk(27))
    # burrs are blunt, so they miss the top octaves
    force = force + undb(scuff_db) * band(scuffs(), 380, 4250, order=2)
    rub = unit(shifting(gap(through(force, response(rub_colour, VISE_MODES)))))
    sound = rub + undb(-16.0) * chirps(hi_hz=2594) + undb(-10.5) * chatter()
    grind = band(sound, 30, split_hz) / np.std(band(sound, 240, 9000))
    hiss = unit(band(sound, split_hz, 25000))
    grind_gain, hiss_gain = friction()
    return grind_gain * grind + hiss_gain * hiss


def scene():
    """The vise, the camera and the room at one microphone."""
    vise = screw() + jaw() + handle() + thread() + squeak()
    return (vise + steel_ring(vise) + creak() + rattle() + camera() + air())[None]


def record(dry):
    """The camera stops just short of full scale and cuts the top."""
    top_hz = 15900
    low_pass = signal.ellip(10, 0.2, 80, top_hz, fs=SR, output="sos")
    return signal.sosfilt(low_pass, np.clip(dry, -0.9, 0.9))


dry = scene()
out = record(dry)
persist_wave(out)
```